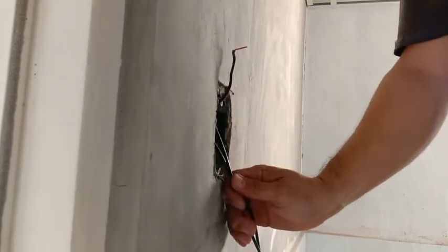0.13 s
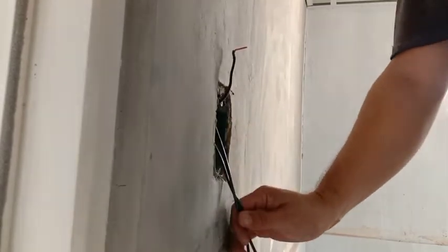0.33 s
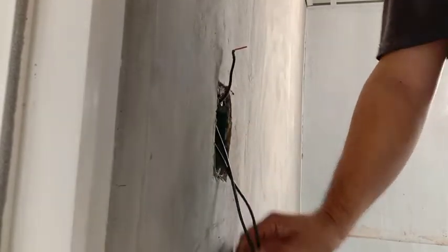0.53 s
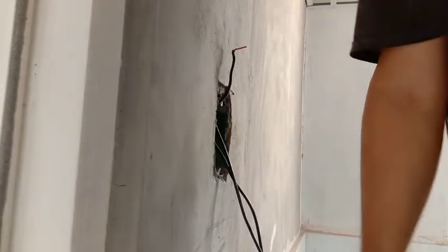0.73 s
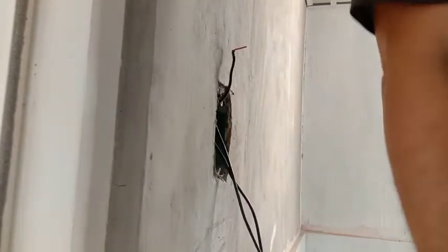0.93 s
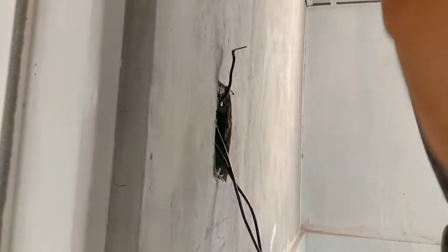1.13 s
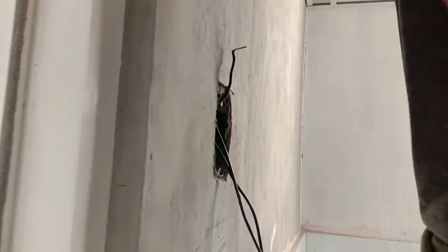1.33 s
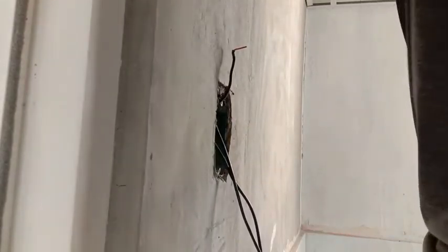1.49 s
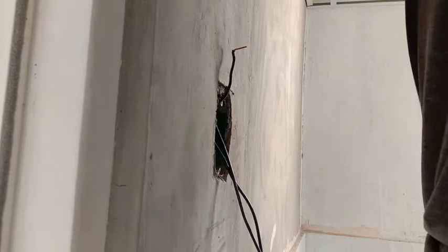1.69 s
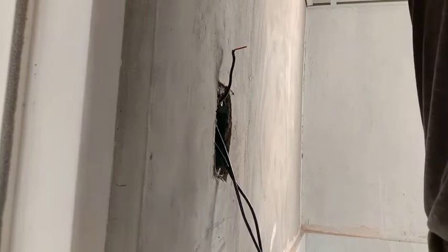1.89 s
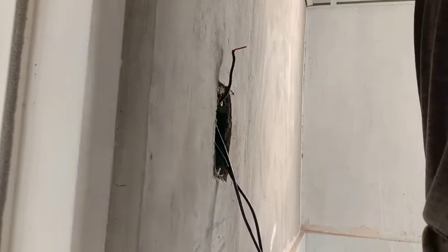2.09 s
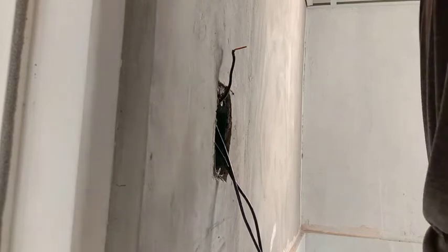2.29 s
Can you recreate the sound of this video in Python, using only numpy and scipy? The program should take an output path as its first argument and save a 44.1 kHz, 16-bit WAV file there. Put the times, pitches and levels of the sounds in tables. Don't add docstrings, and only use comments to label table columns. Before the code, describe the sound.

Close phone pickup in a hard, empty room: slack wire whips the switch box and tube with sharp echoing knocks, its insulation rasping between hits, over soft floor thumps, faint cloth brushing and distant traffic rumble.

```python
import sys
import numpy as np
from scipy import signal
from scipy.fft import rfft, irfft, next_fast_len
from scipy.io import wavfile
from scipy.ndimage import map_coordinates

SR = 44100
rng = np.random.default_rng(int(sys.argv[2]) if len(sys.argv) > 2 else 0)


def volts_from_decibels(level):
    exponent = np.asarray(level, float) / 20
    return 10 ** exponent


def transcribe(u):
    v = np.clip(np.atleast_2d(u).T, -1, 1)
    q = np.round(v * 32767).astype(np.int16)
    wavfile.write(sys.argv[1], SR, q)


N = 105840


def unit(x):
    return x / np.sqrt(np.mean(x ** 2) + 1e-20)


def along(points, hz):
    f, v = np.transpose(points)
    return np.interp(np.log(hz + 1), np.log(f + 1), v)


def curve(rows):
    s, v = np.transpose(rows)
    return np.interp(np.arange(N) / SR, s, v)


def wobble(rate, size=N):
    knots = rng.standard_normal(4000)
    return map_coordinates(knots, [np.arange(size) * rate / SR], mode="mirror")


def filtered(x, response):
    n = x.shape[-1]
    m = next_fast_len(n + 8192)
    spectrum = rfft(x, m) * response(np.fft.rfftfreq(m, 1 / SR))
    return irfft(spectrum, m)[..., :n]


def causal(points):
    def response(hz):
        cepstrum = irfft(np.log(volts_from_decibels(np.maximum(along(points, hz), -70))))
        half = len(cepstrum) // 2
        cepstrum[1:half] *= 2
        cepstrum[half + 1:] = 0
        return np.exp(rfft(cepstrum))
    return response


def resonance(hz, width_hz):
    return lambda f: 1j * f * width_hz / (hz * hz - f * f + 1j * f * width_hz)


def noise(response):
    return unit(filtered(rng.standard_normal(N), response))


def room(x, wet_db):
    # frequency in Hz, time to fall 60 dB in seconds.
    decay = [(400, 1), (1000, 0.56), (3000, 0.53), (6000, 0.41), (12000, 0.29)]
    rise_s = 0.0007
    hz, t, z = signal.stft(rng.standard_normal(SR // 2), SR, nperseg=256)
    fall_db = -60 * t / along(decay, hz)[:, None]
    tail = signal.istft(z * volts_from_decibels(fall_db), SR, nperseg=256)[1]
    tail = tail * (1 - np.exp(-np.arange(len(tail)) / SR / rise_s))
    wet = signal.fftconvolve(x, tail / np.linalg.norm(tail))[:len(x)]
    return x + volts_from_decibels(wet_db) * wet


def circuit():
    return volts_from_decibels(-86 + 2.2 * wobble(3.6)) * noise(resonance(15000, 1500))


def traffic():
    # frequency in Hz, level in dB per Hz.
    colour = [(25, -46), (80, -4), (160, -5), (700, -15), (1300, -14), (4200, -36), (5200, -31),
              (6300, -48)]
    return noise(causal(colour)) * volts_from_decibels(-60.5 + 0.88 * wobble(6.3))


def thumps():
    # start in seconds, level in dB, pitch in Hz, time to fall 60 dB in seconds.
    shifts = [(0.039, -58, 214, 0.14), (0.2, -60, 162, 0.17), (.27, -52.5, 206, 0.26),
              (.42, -60, 229, 0.18), (.59, -59, 83.7, 0.53), (.6, -59, 165, 0.25), (.69, -53, 127.7, 0.25),
              (.75, -51.5, 158.5, 0.14), (.84, -48.5, 157, 0.11), (0.951, -63.5, 131, 0.32),
              (1.199, -64.5, 80.6, 1), (1.199, -50.5, 154, 0.13), (1.289, -51, 141, 0.19),
              (1.4, -59.5, 150, 0.24), (1.6, -58, 68.4, 0.15), (1.811, -58, 136, 0.22), (1.88, -61, 86, .3),
              (1.948, -58, 256, 0.4), (2.039, -56, 144, 0.38), (2.049, -58, 369, 0.4),
              (2.129, -59.5, 262, 0.32), (2.14, -57.5, 338, 0.25), (2.179, -56, 145, 0.25),
              (2.1, -64, 530, 0.77), (2.25, -60.5, 596, 0.45)]
    rise_s = 0.017
    out, t = np.zeros(N + SR), np.arange(SR // 2) / SR
    for s, db, hz, t60 in shifts:
        shape = volts_from_decibels(db + 12.0 - 60 * t / t60) * (1 - np.exp(-(t / rise_s) ** 2))
        cycles = hz * np.cumsum(1 + 0.108 * wobble(40.2, size=len(t))) / SR
        out[round(s * SR):][:len(t)] += shape * np.sin(2 * np.pi * cycles)
    return out[:N]


def sleeve():
    # middle in seconds, half length in seconds, level in dB.
    strokes = [(0.027, 0.082, -64), (0.563, 0.063, -65.5), (0.98, .025, -71), (1.23, 0.04, -66),
               (1.402, 0.044, -92), (1.72, 0.13, -72.5), (2.263, 0.12, -65.5)]
    # frequency in Hz, level in dB per Hz.
    hiss = [(4000, -28), (8000, -3), (10000, -4), (15000, 1)]
    t = np.arange(N) / SR
    level = sum(volts_from_decibels(db) * np.exp(-np.abs((t - s) / half) ** 4) for s, half, db in strokes)
    return level * noise(causal(hiss))


def strand():
    # time in seconds, level in dB.
    singing = [(0.0, -49.5), (0.11, -59), (0.3, -52.5), (0.42, -59), (0.55, -46.5), (0.86, -58),
               (0.96, -58), (1.1, -71), (1.17, -59), (1.22, -58), (1.35, -53.5), (1.5, -59), (1.62, -50),
               (1.9, -58), (1.96, -52.5), (2.14, -47), (2.4, -47.5)]
    mode = resonance(1236, 122)
    return noise(lambda f: mode(f) ** 2) * volts_from_decibels(curve(singing) + 1.77 * wobble(25.01))


def rasp():
    # time in seconds, drag level in dB.
    drag = [(0, -46.5), (.15, -68.5), (.45, -63.5), (.54, -47.5), (.62, -50), (.75, -64), (1.0, -59),
            (1.05, -69), (1.4, -57.5), (1.59, -61.5), (1.62, -50), (1.83, -50), (1.86, -54.5), (2.1, -42.5),
            (2.25, -55), (2.4, -61.5)]
    # frequency in Hz, level in dB per Hz.
    colour = [(300, -23.5), (600, -11), (1500, -6.5), (2160, -7.5), (3500, -9), (5400, -13), (7500, -34.5),
              (16000, -48)]
    slips_per_s, spread_db = 4000, 3
    slips = (rng.random(N) < slips_per_s / SR) * rng.standard_normal(N)
    slips = slips * volts_from_decibels(spread_db * rng.standard_normal(N))
    slips = unit(filtered(slips, causal(colour))) * volts_from_decibels(curve(drag) + 0.45 * wobble(13.0))
    return room(slips, 2) * volts_from_decibels(-2.5)


def slide():
    # time in seconds, pitch in Hz, level in dB.
    squeak = [(1.5, 1500, -64), (1.6, 1508, -61), (1.629, 1520, -53), (1.7, 1562, -50), (1.77, 1635, -50),
              (1.83, 1677, -51), (1.861, 1650, -61), (1.96, 1600, -58)]
    s, hz, db = np.transpose(squeak)
    t = np.arange(N) / SR
    phase = 2 * np.pi * np.cumsum(np.interp(t, s, hz)) / SR

    def band(k, width_hz):
        across = np.cos(k * phase) * wobble(width_hz)
        return unit(across + np.sin(k * phase) * wobble(width_hz))

    fuzz = band(0.99, 420) + volts_from_decibels(-7) * band(2.1, 600)
    level_db = np.interp(t, s, db, left=-120, right=-120) + 1.8 * wobble(30.8)
    return room(fuzz * volts_from_decibels(level_db), 0) * volts_from_decibels(-1.5)


def whips():
    # start in seconds, level in dB, object (rounded: 0 box, 1 tube, 2 floor, 3 bend, 4 slack),
    # push length in seconds.
    contacts = [(-.1, -35.5, 2.5, 0.0016), (.242, -25, 0.5, 0.0091), (0.2491, -16, 0, 0.0033),
                (.257, -21, 0.5, 0.002), (0.274, -23.5, 0, 0.0023), (0.651, -30, 1, 0.0056),
                (.842, -35, 4, 0.005), (1.174, -26.5, 2, 0.0093), (1.190, -28.5, 2, 0.0027),
                (1.197, -33.5, 1.5, 0.002), (1.221, -30.5, 2.5, 0.0022), (1.23, -34.5, 1.5, 0.0036),
                (1.241, -51, 1.5, 0.0017), (1.9399, -25.5, 3, 0.0047), (1.945, -17.5, 3, 0.005),
                (1.951, -25.5, 3, .003)]
    # frequency in Hz, level in dB per Hz.
    box = [(300, -44), (800, -14), (1500, -3.5), (2200, -7.5), (3000, -3), (5500, -13), (7500, -28.5),
           (16000, -32.5)]
    tube = [(500, -33), (1200, -4.5), (1850, -7.5), (2480, -11), (3500, 0.5), (5300, -8), (7800, -23),
            (16000, -35)]
    floor = [(280, -43.5), (600, -10), (1340, -2.5), (2100, -10.5), (3100, -7.5), (5000, -14.5),
             (7500, -33), (16000, -52)]
    bend = [(600, -34), (1100, -10), (2500, -15), (3350, 1), (4000, -13), (5600, -13), (7600, -29),
            (16000, -32)]
    slack = [(600, -31), (1100, -8.5), (1850, -5), (2500, -7), (3000, -6), (5300, -4), (7800, -30),
             (16000, -41)]
    # frequency in Hz, level in dB, time to fall 60 dB in seconds.
    box_ring = [(539.3, -23.5, 0.33), (775, -11, .3), (954.6, 1.5, 0.27), (1160, -23, .25),
                (1283, -10.5, 0.4), (1528, -2, 0.097), (1663, -7.5, 0.21), (2627, -5, 0.18),
                (2790, -4, 0.22), (3035, -6, 0.18), (3135, -6, 0.22), (3760, -22, .15), (5319, -14, .15),
                (6480, -18, .12)]
    tube_ring = [(1773, -4.5, 0.041), (1946, -1, 0.023), (3260, -0.5, 0.034), (3500, 5, 0.019),
                 (3990, 1, 0.018), (5266, -1, 0.024)]
    floor_ring = [(629.6, -7.5, 0.26), (764, -1.5, 0.12), (910, 2.5, 0.14), (1083, -4, 0.11),
                  (1160, -2, 0.12), (1352, -4.5, 0.27), (3000, -7, 0.09)]
    bend_ring = [(947, -3, .2), (1271, -5, .34), (1529, 1, .22), (1599, -6.5, 0.13), (1853, -3.5, 0.12),
                 (2266, -11, 0.17), (3087, -3, 0.19), (3163, -1, 0.28), (3210, -12, 0.12),
                 (3412, -2.5, 0.26), (3443, -2, 0.27), (3630, -7, 0.15), (4940, -22, .15), (5900, -14, .15)]
    slack_ring = [(1784, -5, 0.033), (1888, -2.5, 0.032), (2300, -11, .03), (3080, -1, .03), (4100, 3, .02),
                  (5390, -3, 0.018)]
    ring_db = [0.5, -2.5, 0.5, 5, -1]
    ring_room_db = [-1.5, 5.5, 0.5, -3, 5]
    colours = [box, tube, floor, bend, slack]
    rings = [box_ring, tube_ring, floor_ring, bend_ring, slack_ring]
    crack_rise_s, ring_rise_s, flutter_db = 0.001, 0.0013, 3.2

    out = np.zeros(N + 2 * SR)
    t = np.arange(SR // 2) / SR
    for s, db, kind, push in contacts:
        k = int(round(kind))
        shape = np.exp(-t / push) * (1 - np.exp(-t / crack_rise_s))
        crack = rng.standard_normal(len(t)) * shape
        for _ in range(3):
            z = rfft(crack)
            crack = irfft(z / np.abs(z), len(t)) * np.sqrt(shape)
        crack = filtered(crack, causal(colours[k]))

        ring = np.zeros(len(t))
        for hz, level, t60 in rings[k]:
            mode_db = level + flutter_db * wobble(50, size=len(t)) - 60 * t / t60
            ring += volts_from_decibels(mode_db) * np.sin(2 * np.pi * hz * (s + t))
        ring = ring * (1 - np.exp(-t / ring_rise_s))

        heard = room(crack / np.linalg.norm(crack), 6.5)
        heard = heard + volts_from_decibels(ring_db[k]) * room(ring / np.linalg.norm(ring), ring_room_db[k])
        out[SR + round(s * SR):][:len(heard)] += volts_from_decibels(db + 21.5) * heard
    return out[SR:SR + N]


def scene():
    background = circuit() + traffic() + thumps() + sleeve()
    wire = strand() + rasp() + slide() + whips()
    return (background + wire)[None]


def roll_off(x):
    return signal.sosfilt(signal.butter(12, 16500, fs=SR, output="sos"), x)


def record(dry):
    # frequency in Hz, width in Hz, gain in dB.
    port = [(4200, 150, -2), (5390, 130, 2), (8110, 550, -10.5), (13400, 670, -7), (14800, 800, 6)]

    def mic(f):
        gain_db = sum(db * np.exp(-((f - hz) / width_hz) ** 2) for hz, width_hz, db in port)
        return volts_from_decibels(gain_db) * (f < 15750)

    return roll_off(filtered(dry, mic))


dry = scene()
out = record(dry)
transcribe(out)
```